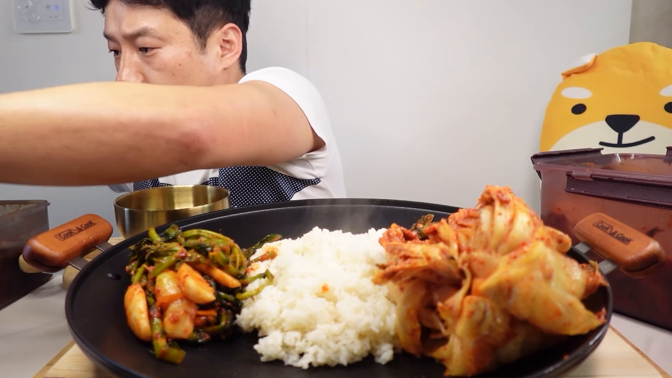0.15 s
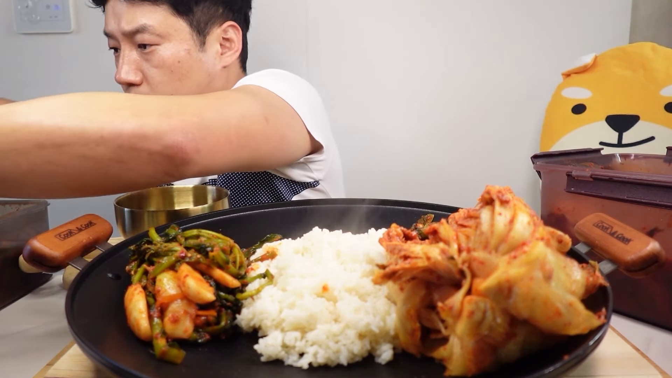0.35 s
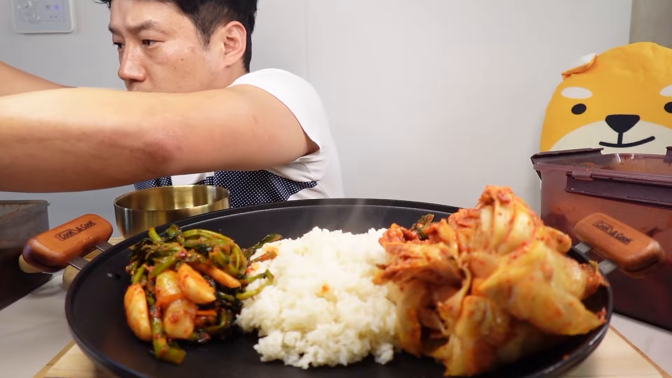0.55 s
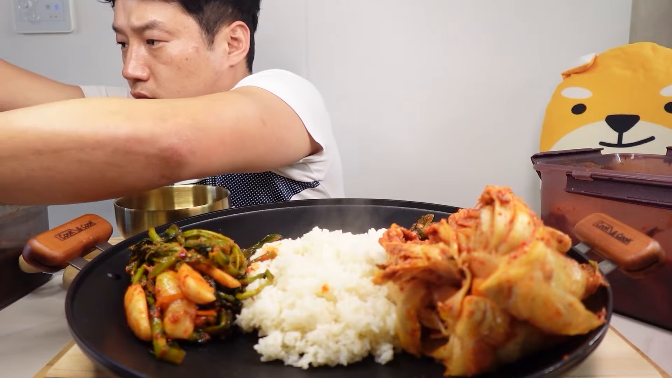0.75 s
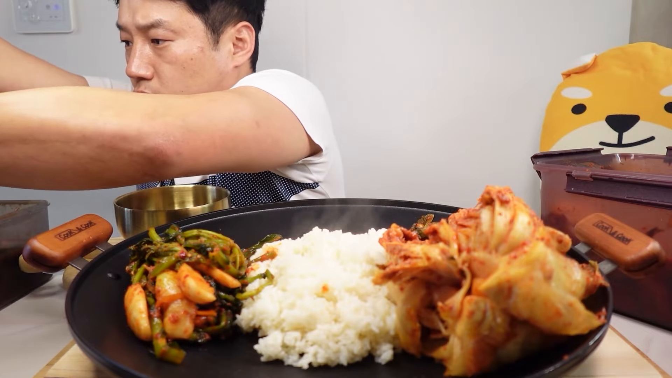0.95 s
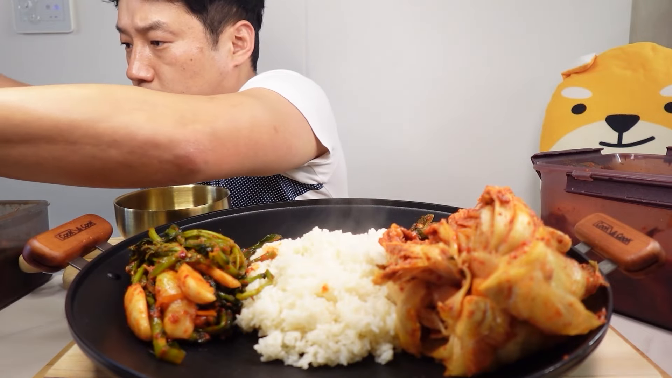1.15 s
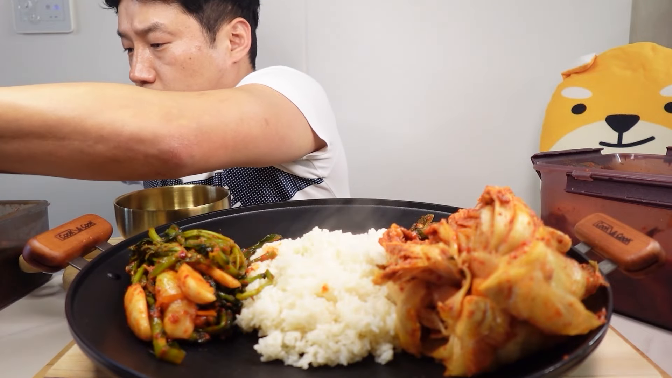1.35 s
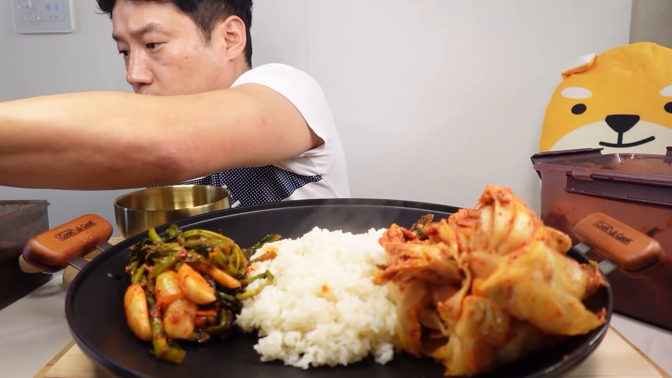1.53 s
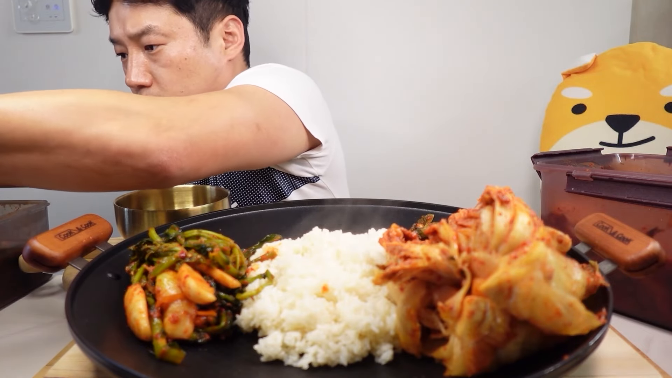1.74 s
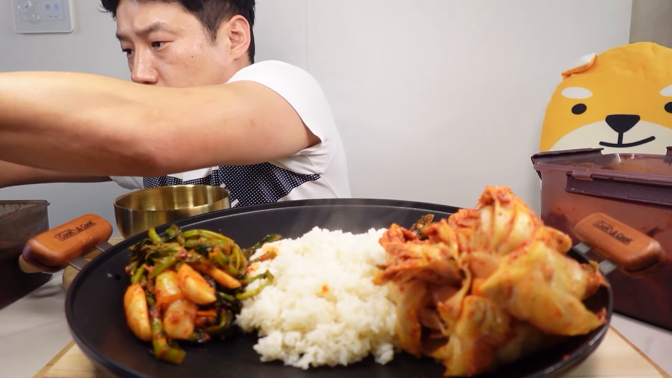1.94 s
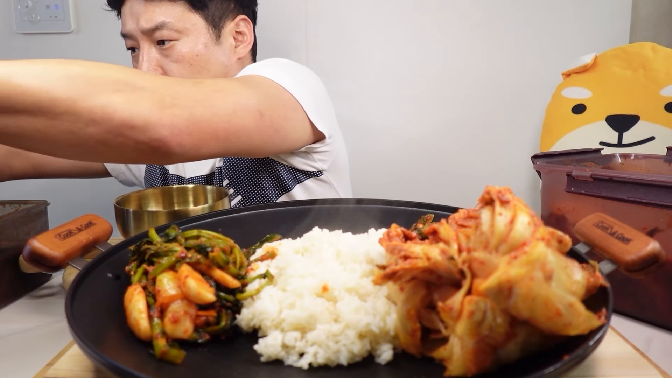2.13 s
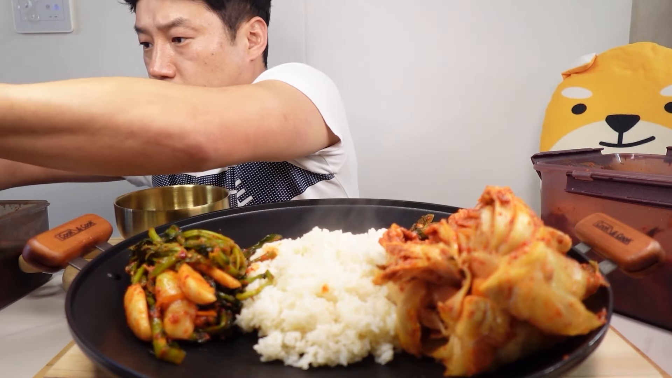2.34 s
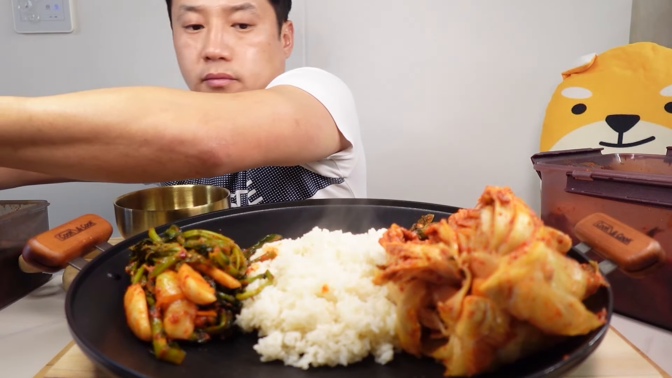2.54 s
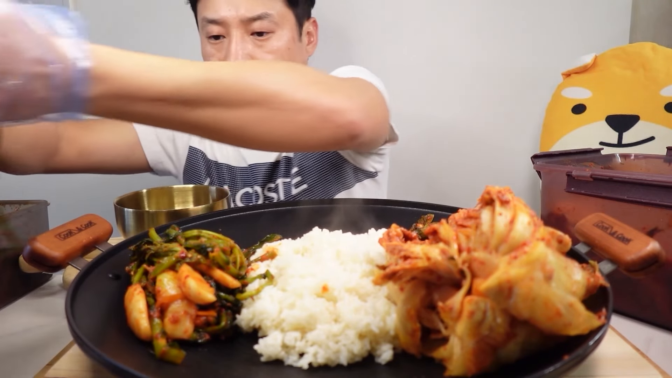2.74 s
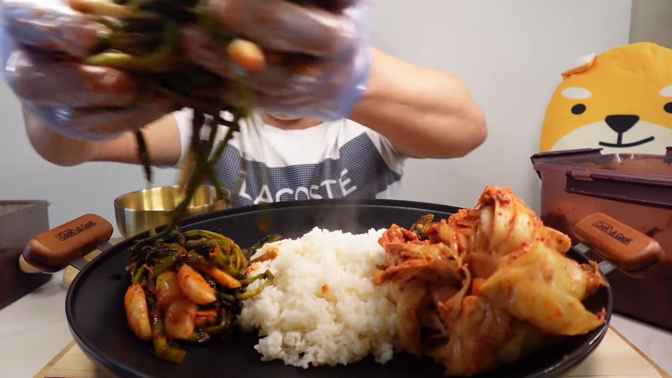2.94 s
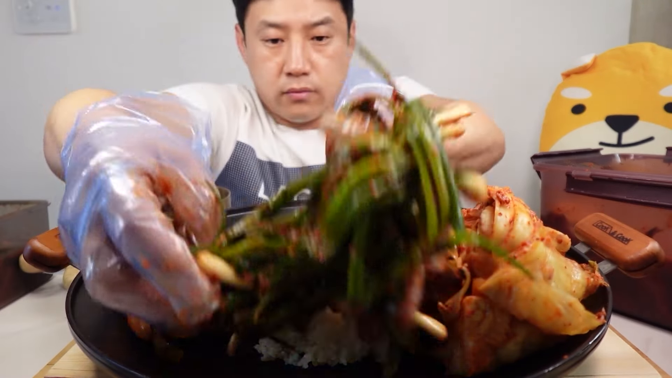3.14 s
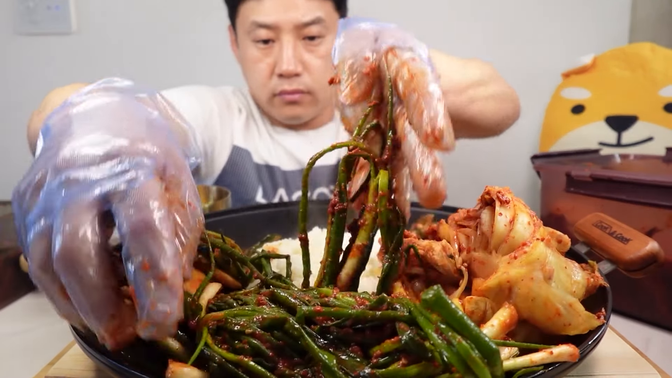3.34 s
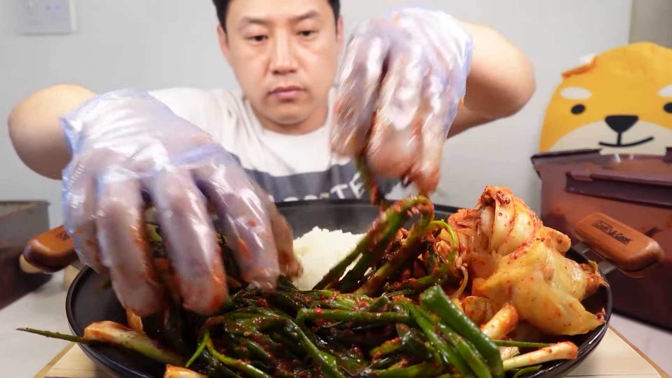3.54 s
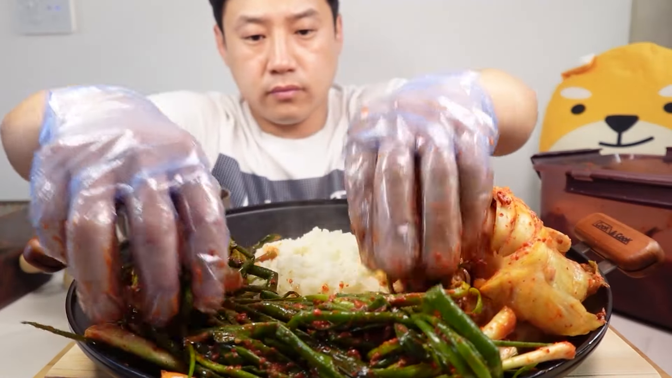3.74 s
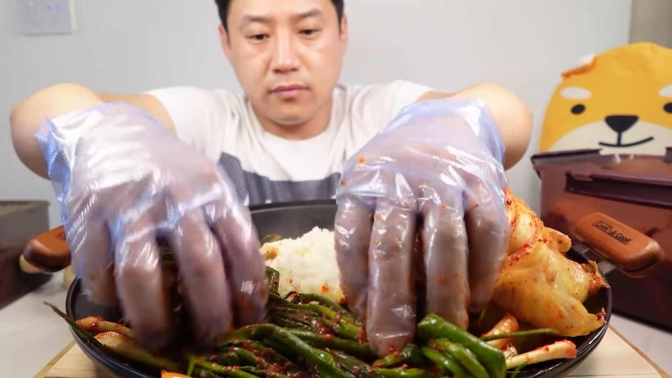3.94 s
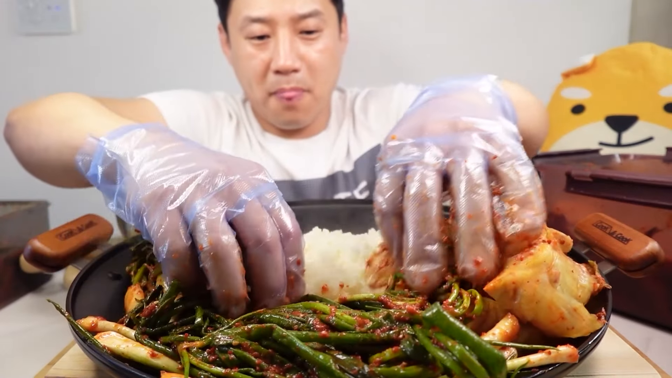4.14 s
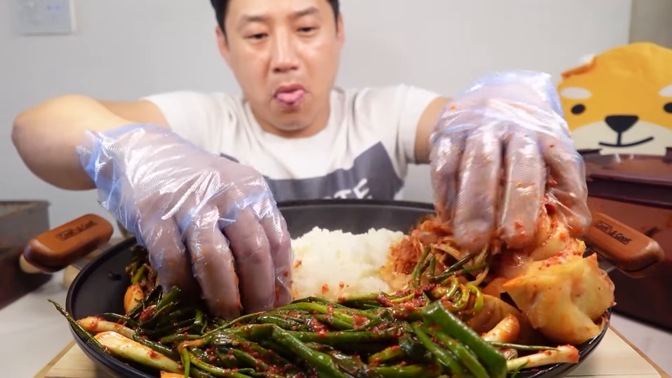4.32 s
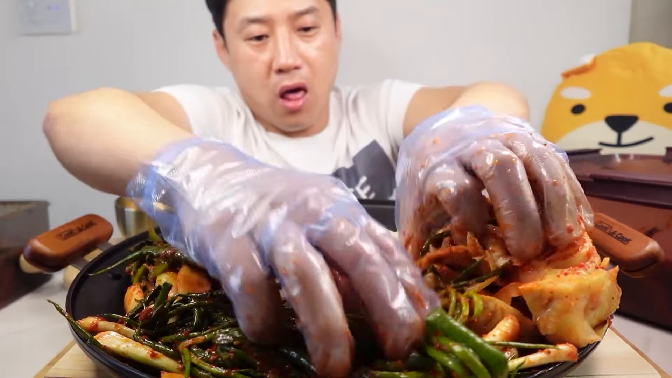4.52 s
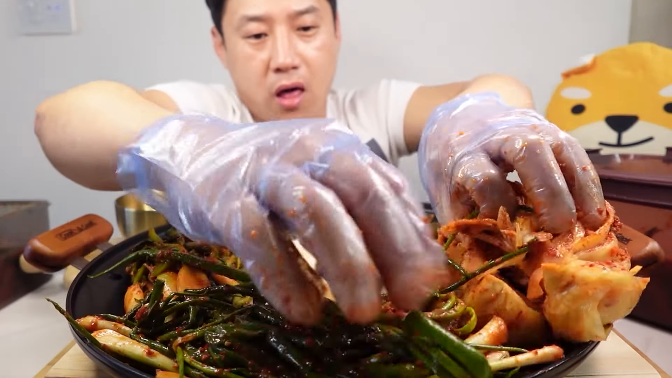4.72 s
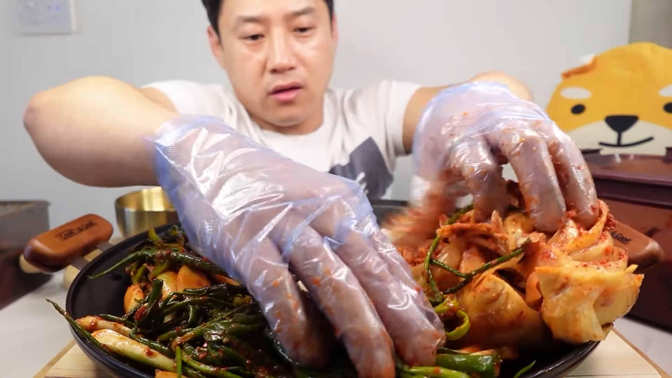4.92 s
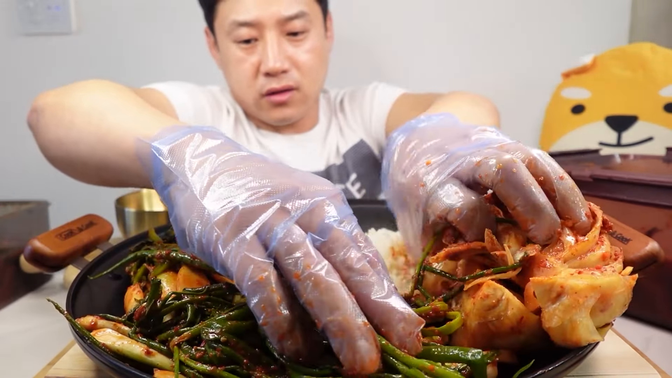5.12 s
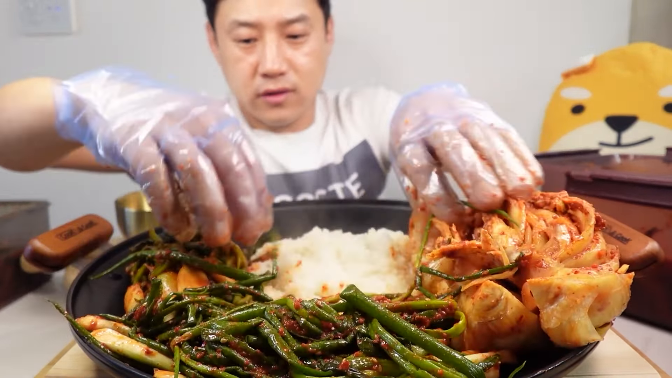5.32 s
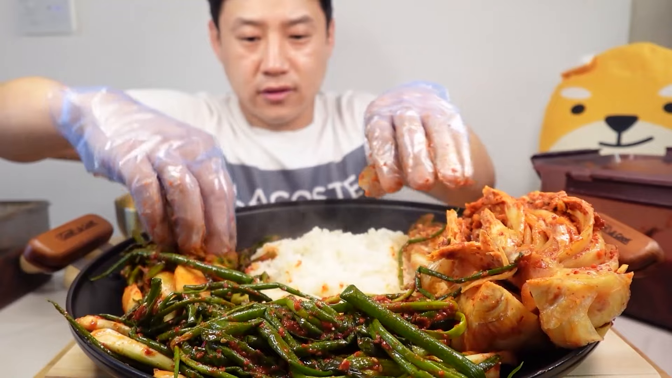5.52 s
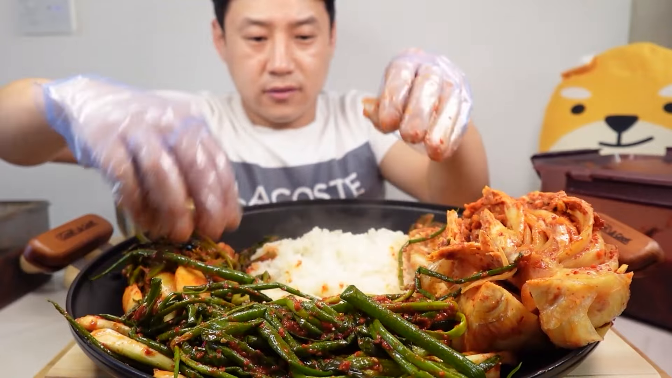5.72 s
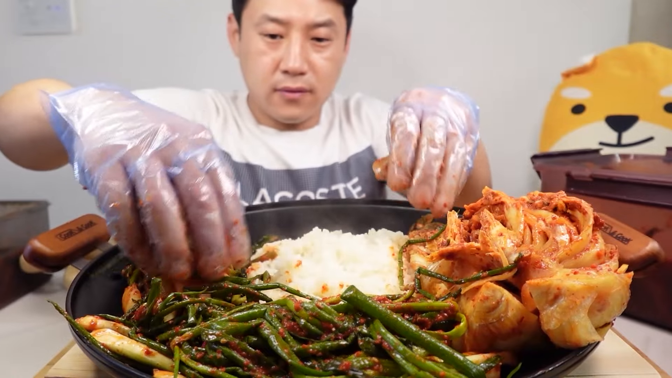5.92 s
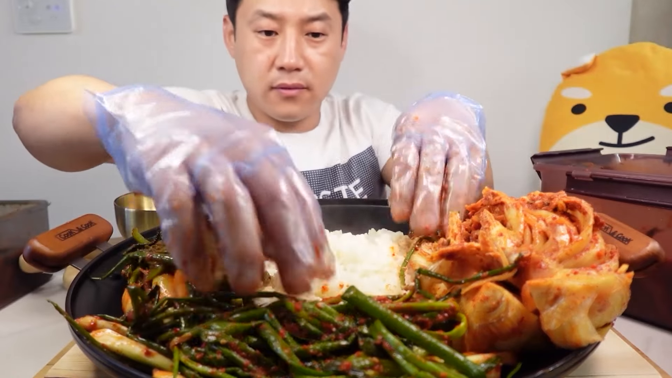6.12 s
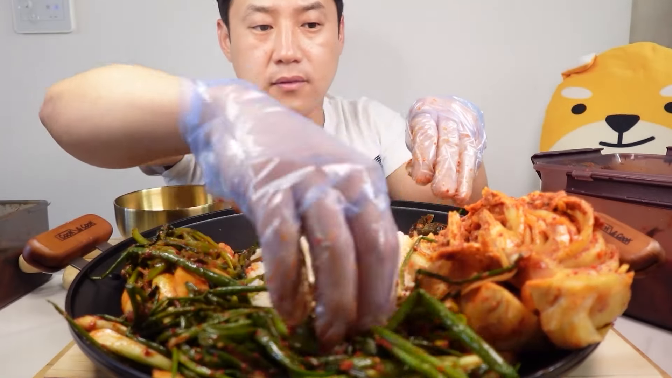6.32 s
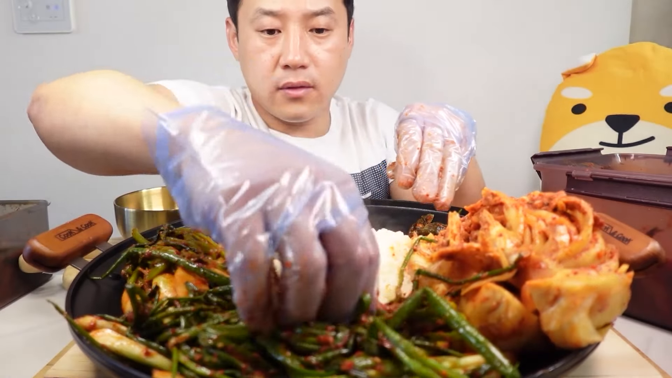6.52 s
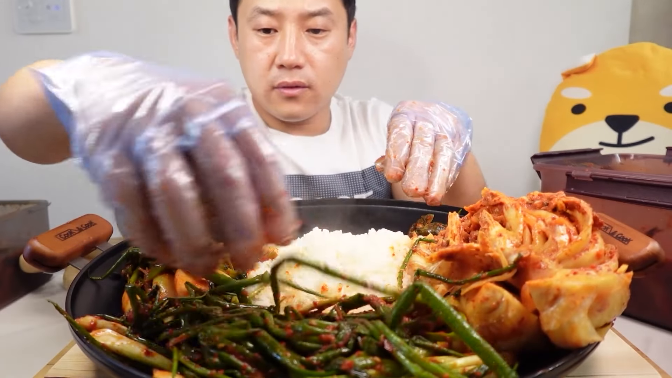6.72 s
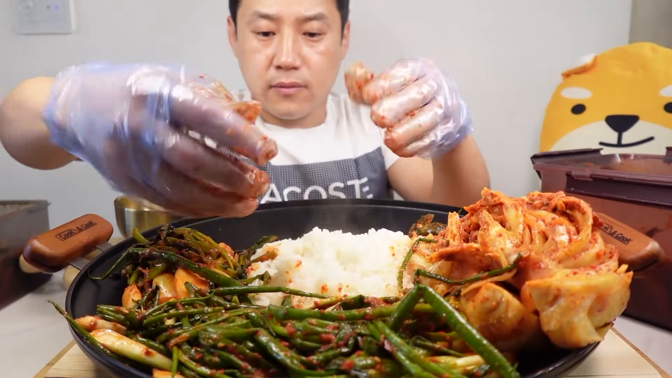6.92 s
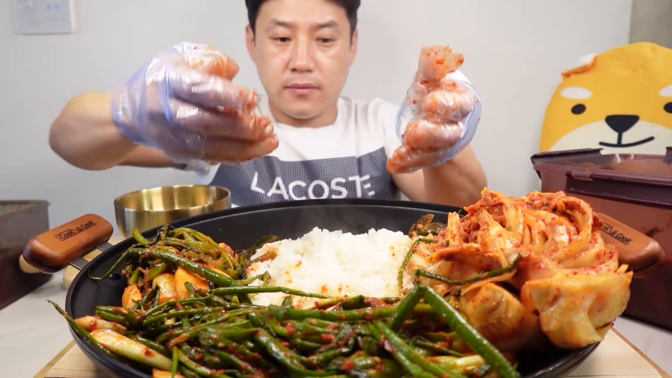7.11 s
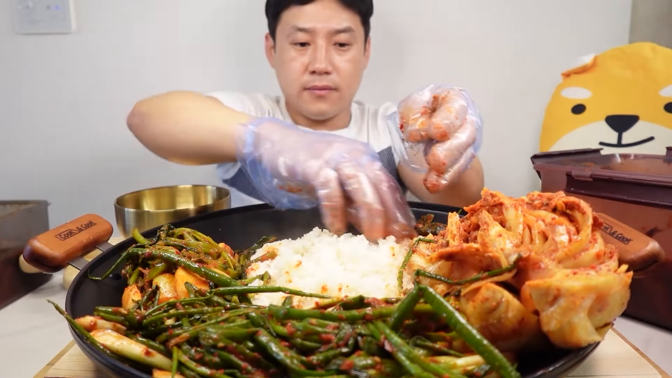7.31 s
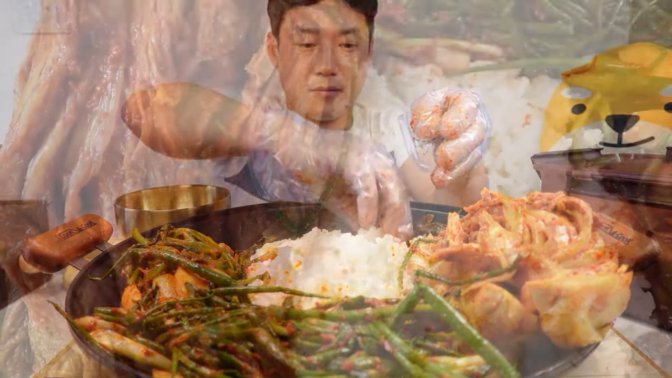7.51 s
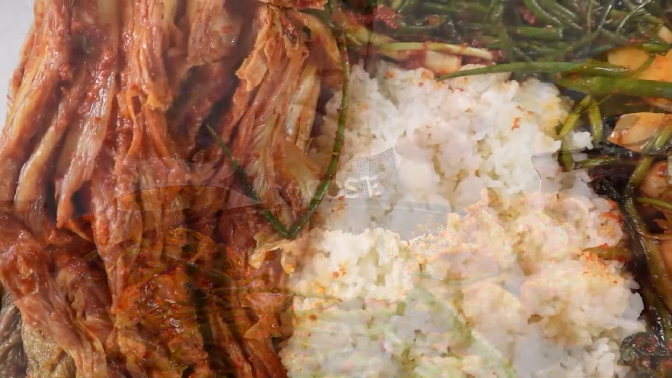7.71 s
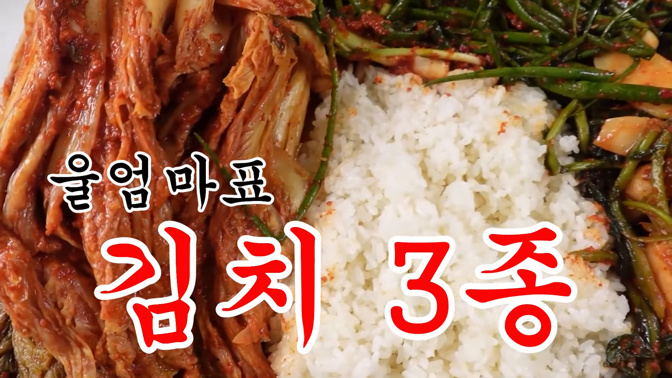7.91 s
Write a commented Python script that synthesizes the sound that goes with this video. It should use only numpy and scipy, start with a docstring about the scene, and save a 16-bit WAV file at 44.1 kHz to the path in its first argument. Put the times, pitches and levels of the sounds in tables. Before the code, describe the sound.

A small room with faint steady hiss. From 0 to about 2.5 s, thin plastic gloves crinkle softly, somewhat to the left and with more room around them: fine dry crackle in short uneven bursts, lower papery folds beneath, only an occasional tiny snap. Around 2.7 s the rustle almost vanishes. From 3 s it returns much closer, centred, drier and louder as the hands lay greens on a near pan. Between 3.2 and 5.2 s the crackle is busiest, packed with bright, sharp crease snaps, strongest about 3.8 to 4.3 s. From 5.3 to 6.7 s it breaks into shorter ticks and brief rustles with small gaps. After 6.8 s the handling grows lighter, with a few weaker snaps. At about 7.6 s everything stops dead, and a quiet, duller, steady room noise remains to the end, around 8 s.

```python
"""A small hissing room: hands in thin plastic gloves gather wet greens at one side, then lay them on a near pan.
Film crackle is random clicks ringing small resonant facets; folds are the same film, coloured lower.
Single creases snap as a resonant crack plus a shiver; dense random echoes scatter everything.
Near the end the rustle stops dead and a duller, steady room noise (coloured noise) takes over."""
import sys
import numpy as np
from scipy import signal
from scipy.fft import rfft, irfft, next_fast_len
from scipy.io import wavfile
from scipy.ndimage import uniform_filter1d

SR = 44100
rng = np.random.default_rng(int(sys.argv[2]) if len(sys.argv) > 2 else 0)


def put_to_file(sound):
    """Save the sound as 16-bit audio at rate SR, in the file named by the first command-line argument."""
    columns = np.atleast_2d(sound).T  # one column per channel
    safe = np.clip(columns, -1, 1)
    whole_steps = np.round(safe * 32767)
    wavfile.write(sys.argv[1], SR, whole_steps.astype(np.int16))


N = 355432
LIFT_S = 2.8  # greens leave the tub
CHANGE_S = 7.628  # rustle stops, room noise changes
CUTOFF_HZ = 16000


def from_db(db):
    """Decibels to gain."""
    return 10 ** (np.asarray(db) / 20)


def rms_one(x):
    """Scale to unit power."""
    return x / np.sqrt(np.mean(x ** 2) + 1e-20)


def in_time(rows):
    """Each column of a curve, interpolated sample by sample."""
    s, *columns = np.transpose(rows)
    return [np.interp(np.arange(N) / SR, s, column) for column in columns]


def coloured(x, spectrum):
    """Filter by a response of (Hz, dB) points, joined on a log frequency axis."""
    size = next_fast_len(N + SR // 10)
    hz, db = np.transpose(spectrum)
    bins_hz = np.maximum(np.fft.rfftfreq(size, 1 / SR), 1)
    gain = from_db(np.interp(np.log(bins_hz), np.log(hz), db))
    return irfft(rfft(x, size) * gain, size)[..., :N]


def drift(rate_hz):
    """Random curve of unit power, joining rate_hz new values a second by straight lines."""
    values = rng.standard_normal(N // 8)
    return rms_one(np.interp(np.arange(N) / SR * rate_hz, np.arange(N // 8), values))


def evened(x, span_s):
    """Hold the short-term power near 1, so that later gains set the level."""
    size = max(int(span_s * SR), 8)
    power = uniform_filter1d(uniform_filter1d(x ** 2, size), size)
    return x / np.sqrt(power + 1e-12)


def facet(clicks, hz, q):
    """A small patch of film rings briefly: two equal resonators in series give steep skirts."""
    r = np.exp(-np.pi * hz / max(q, .5) / SR)
    peak = (1 - r * r) / 2
    resonance = [peak, 0, -peak, 1, -2 * r * np.cos(2 * np.pi * hz / SR), r * r]
    return signal.sosfilt([resonance, resonance], clicks + 1e-18)


# Steady handling between bursts. Each row: time in seconds, relative crackle level in dB,
# relative fold level in dB re crackle.
HANDLING = [(0, -38.5, -14.5), (.4, -54.5, -8), (.65, -44.5, -19), (1.1, -43.5, -13), (1.4, -40.5, -9),
            (1.9, -45, -11), (2.45, -44, -11.5), (2.7, -61, -1), (2.95, -52.5, -9), (3.3, -31.5, -11),
            (3.42, -41, -15), (3.6, -38.5, -11), (5.25, -34, -8), (5.5, -44.5, -9), (6.5, -40, -10),
            (6.9, -50.5, -7.5), (7.15, -43, -15.5), (7.6, -42, -6)]
# Bursts of crackle, from very brief to about 0.2 s. Each row: start in seconds, length in seconds,
# relative crackle level in dB, relative fold level in dB re crackle.
BURSTS = [(0.0, 0.085, -45, -4), (0.148, 0.15, -41.5, -15), (0.52, 0.068, -42, -21),
          (0.718, 0.027, -39, -19), (0.777, 0.075, -39.5, -12.5), (0.946, 0.12, -46.5, -9),
          (1.244, 0.119, -37.0, -25), (1.551, 0.13, -37.5, -7.5), (2.07, 0.081, -36.5, -19),
          (2.245, 0.091, -44.5, -23), (2.578, 0.07, -46.5, -10), (3.003, 0.141, -40, -13),
          (3.186, 0.13, -30.5, -12.5), (3.324, 0.052, -38, -6.5), (3.499, 0.2, -34.0, -16.5),
          (3.671, 0.038, -30, -9), (3.736, 0.066, -30, -11.5), (3.946, 0.051, -28, -17),
          (4.019, 0.031, -32.5, -10), (4.123, 0.12, -30, -14.5), (4.359, 0.062, -33.5, -12),
          (4.478, 0.19, -30.0, -12), (4.769, 0.1, -35.5, -16), (4.941, 0.14, -31.5, -11.5),
          (5.073, 0.094, -34, -8), (5.293, 0.0069, -29.0, -10), (5.397, 0.042, -37.5, -10),
          (5.519, 0.022, -33, -17), (5.572, 0.026, -42.0, -14), (5.631, 0.019, -36, -23),
          (5.674, 0.031, -39, -21), (5.776, 0.061, -34, -14.5), (5.87, 0.01, -33.0, -14),
          (6.046, 0.051, -32.5, -10.5), (6.15, 0.075, -35, -9), (6.239, 0.029, -29, -13.5),
          (6.348, 0.016, -33, -9.5), (6.5, 0.094, -33.5, -9.5), (6.662, 0.063, -37.0, -10),
          (6.79, 0.066, -38.5, -10.5), (6.93, 0.17, -39.5, -20), (7.179, 0.18, -41.5, -16.5),
          (7.336, 0.064, -40, -8), (7.472, 0.025, -36.5, -6.5)]
ATTACK_S, EASE_DB, RELEASE_S = 0.016, 1.06, 0.029
LULL_DB, LULL_S = 11.5, 0.017  # dip of the handling after a burst: depth, time of its deepest point


def effort():
    """Crackle and fold gains: bursts build, ease and die, adding power to handling that dips after each."""
    t = np.arange(N) / SR
    steady_db, steady_folds_db = in_time(HANDLING)
    crackle_power, fold_power = np.zeros((2, N))
    for start_s, length_s, db, folds_db in BURSTS:
        near = (t > start_s) & (t < start_s + length_s + 10 * RELEASE_S)
        age_s = t[near] - start_s
        idle_s = np.maximum(age_s - length_s, 0)
        attack = np.minimum(age_s / ATTACK_S, 1)
        eased_db = db - EASE_DB * np.minimum(age_s / length_s, 1)
        gain = attack * from_db(eased_db) * np.exp(-idle_s / RELEASE_S)
        crackle_power[near] += gain ** 2
        fold_power[near] += (gain * from_db(folds_db)) ** 2
        lull = (idle_s / LULL_S) ** 2
        steady_db[near] -= LULL_DB * lull * np.exp(1 - lull)
    crackle_power += from_db(steady_db) ** 2
    fold_power += from_db(steady_db + steady_folds_db) ** 2
    return np.sqrt(crackle_power), np.sqrt(fold_power)


def buckles(per_s, spread_db, flurry_db, flurry_hz, patchy_db, q, rub_db, stiffness, count=14):
    """Film buckles in flurries; each click rings one facet, over the soft hiss of film sliding on film."""
    flurry = from_db(flurry_db * (drift(flurry_hz) + 0.75 * drift(450)))
    sizes_db = spread_db * np.minimum(rng.exponential(1, N), 4.5)
    clicks = rng.choice([-1, 1], N) * (rng.random(N) < per_s / SR)
    facet_of_click = rng.integers(0, count, N)
    rings = 0
    for k, hz in enumerate(np.linspace(1650, 16500, count)):
        # high-pitched, stiff facets vary most in size; each has busy and quiet moments
        blow_db = sizes_db * (hz / 10000) ** stiffness + patchy_db * drift(45)
        blows = clicks * (facet_of_click == k) * from_db(blow_db)
        rings = rings + rms_one(facet(blows, hz, q))
    rub = from_db(rub_db) * rng.standard_normal(N)
    return flurry * (evened(rings, 0.28) + rub)


# Colour of the fine crackle. Each row: frequency in Hz, relative density in dB per Hz.
CRACKLE = [(1500, -53), (3000, -17.5), (4200, -7), (5300, -3), (6600, 1.2), (7500, 0.5), (8500, 2.5),
           (9800, 0.5), (12500, 2.1), (16000, 0.5)]


def fine_crackle(film, gain):
    """Small facets: the film's bright part, following the crackle gain."""
    return from_db(-0.63) * gain * evened(coloured(film, CRACKLE), 0.028)


# Colour of the folds in the tub. Each row: frequency in Hz, relative density in dB per Hz.
TUB = [(200, -37), (640, -7.5), (1150, -9.5), (1900, -14), (2700, -1), (3200, 2.5), (3900, -5),
       (4500, -2.5), (8000, -30)]
# Colour of the folds after the lift. Each row: frequency in Hz, relative density in dB per Hz.
FOLDS = [(60, -62), (150, -50), (300, -22.5), (450, -15), (620, -5.5), (800, -9.5), (1100, -6), (1550, -9),
         (2200, 0), (2600, -0.5), (3100, 2), (3800, -2), (5000, -6), (9000, -16.5)]


def larger_folds(film, gain):
    """Larger folds: the same film coloured lower, by the tub until the greens are lifted."""
    in_tub = np.arange(N) / SR < LIFT_S
    rustle = np.where(in_tub, coloured(film, TUB), coloured(film, FOLDS))
    return from_db(-1.5) * gain * evened(rustle, 0.014)


# Lesser creases, levels relative
CREASES_PER_S, CREASE_ABOVE_CRACKLE_DB, CREASE_SPREAD_DB = 26, 16.5, 2
CREASE_HZ, CREASE_SPREAD_OCTAVES, CREASE_SHIVER_DB = 9500, 0.39, -9.5


def lesser_creases(crackle_gain):
    """Chance snaps in runs, louder where the crackle is; rows as in SNAPS."""
    gaps = rng.standard_normal(SR) ** 2  # mean 1, mostly short
    size, pitch = rng.standard_normal((2, SR)).clip(-2, 2)
    s = np.cumsum(gaps) / CREASES_PER_S
    crackle_db = 20 * np.log10(np.interp(s * SR, np.arange(N), crackle_gain))
    db = crackle_db + CREASE_ABOVE_CRACKLE_DB + CREASE_SPREAD_DB * size
    hz = CREASE_HZ * 2 ** (CREASE_SPREAD_OCTAVES * pitch)
    return np.transpose([s, db, hz, np.full(len(s), CREASE_SHIVER_DB)])[s < CHANGE_S]


# Loudest creases. Each row: time in seconds, relative level in dB, pitch in Hz,
# shiver in dB re the crack before softening.
SNAPS = [(0.4233, -23.5, 10800, -4), (0.5247, -18, 14100, -3), (0.87, -13.5, 14500, -5),
         (2.0916, -21, 13300, -2), (2.2645, -17, 11400, -1), (2.905, -28, 12900, -2),
         (3.037, -15, 14300, -3), (3.0861, -11.5, 8350, -3), (3.137, -17, 6420, -1),
         (3.2124, -12, 6640, -2), (3.2864, -10, 6720, -2), (3.3802, -11, 8140, -2), (3.529, -9, 8500, -5),
         (3.6145, -16, 12600, -4), (3.695, -12, 7420, -2), (3.8048, -6, 12300, -2.5),
         (3.8577, -6, 12400, -0.5), (3.9668, -10, 8260, -2), (3.9816, -9, 12200, -2),
         (4.2078, -4, 12500, -3), (4.241, -7.5, 11200, -3), (4.345, -9, 10200, -2), (4.363, -9.5, 8700, -3),
         (4.4024, -15, 9300, 0), (4.5296, -9.5, 8110, -3), (4.5925, -10, 8980, 0), (4.803, -10, 9630, -1),
         (4.8399, -11, 6980, -3), (5.037, -10, 8880, -2), (5.1417, -14, 8910, -2), (5.4788, -19.5, 9600, 1),
         (5.7478, -17, 12400, -2), (5.7963, -8, 8200, -3), (5.876, -16, 13400, -1),
         (5.9384, -13, 11900, -2), (6.0716, -9, 13800, -3), (6.1634, -10.5, 12700, -4),
         (6.2123, -10.5, 8970, 0), (6.2537, -10.5, 13400, 0), (6.3609, -14.5, 6500, -3),
         (6.549, -10, 8450, -3), (6.6333, -18.5, 11900, -4), (6.6946, -10, 14700, -4),
         (6.9336, -21, 11800, -2), (6.983, -13, 12300, -1), (7.189, -20.5, 11400, -3),
         (7.2665, -14.5, 11600, -2), (7.2993, -16, 7600, 0)]


def snaps(crackle_gain, level_db, q, crack_s, slowness, softening_db, shiver_s, broad):
    """A crease gives way in one crack; the film round it settles in a shiver of smaller clicks."""
    out, t = np.zeros(N), np.arange(SR // 25) / SR
    for s, db, hz, shiver_db in [*SNAPS, *lesser_creases(crackle_gain)]:
        # long, low-pitched creases give way more slowly and softly
        length = 12500 / hz
        ring_hz = min(hz, CUTOFF_HZ)
        crack = rng.choice([-1, 1], len(t)) * np.exp(-t / (crack_s * length ** slowness))
        crack = facet(crack, ring_hz, q)
        sparse = rng.standard_normal(len(t)) * (rng.random(len(t)) < .25)
        shiver = sparse * np.exp(-t / (shiver_s * length))
        # a broad resonance spreads the shiver over more pitches
        shiver = facet(shiver, ring_hz, q) + broad * facet(shiver, 7500, 0.46)
        crack, shiver = [r / np.sqrt(np.sum(r ** 2)) for r in (crack, shiver)]
        snap = from_db(-softening_db * np.log2(length)) * crack + from_db(shiver_db) * shiver
        at = int((s + .001) * SR)
        out[at:at + len(t)] += from_db(db + level_db) * snap
    return out


def echoes(x, t60_s, delay_s, channels, size=1024):
    """Dense dying reflections whose random paths change block by block."""
    t = np.arange(int(np.clip(t60_s, .01, .5) * SR * 2 / 3)) / SR
    shape = from_db(-60 * t / t60_s) * np.clip(t / delay_s - 1, 0, 1)
    shape /= np.sqrt(np.sum(shape ** 2)) + 1e-12
    paths = rng.standard_normal((channels, SR))
    out = np.zeros((channels, N + size + len(t)))
    picks = rng.integers(0, SR // 2, N // size + 1)
    for at, pick in zip(range(0, N, size), picks):
        response = shape * paths[:, pick:pick + len(t)]
        tail = signal.fftconvolve(x[None, at:at + size], response, axes=1)
        out[:, at:at + tail.shape[1]] += tail
    return out[:, :N]


def scattered(source, wet_db, pan_db):
    """Pan and hands scatter first, then the room; the direct sound is placed left to right."""
    direct = source + from_db(-10.0) * echoes(source, t60_s=0.025, delay_s=0.00039, channels=1)[0]
    # small random wavering between left and right
    near = direct * from_db((pan_db + .8 * drift(69)) / 2 * np.array([[1], [-1]]))
    wet = from_db(wet_db)
    room = wet * echoes(direct, t60_s=0.088, delay_s=0.0022, channels=2)
    return (near + room) / np.sqrt(1 + wet ** 2 / 2)


# Where the hands work. Each row: time in seconds, room share in dB re direct, left minus right in dB,
# buckles per second, spread of their sizes in dB at 10 kHz.
REACH = [(0, -5, 4, 8500, 4), (1.7, -4.5, 4.5, 9500, 3), (2.5, -6, 4.4, 7200, 2), (3.1, -13, 0.5, 4400, 2),
         (4.3, -14.5, -0.5, 3700, 3.5), (5.2, -13.5, -0.5, 5400, 3), (5.6, -11, 1, 3300, 4.5),
         (6.7, -13, 0, 3000, 2.5), (7.6, -11.5, 0, 4100, 4)]


def gloves():
    """Crackle, folds and snaps of one film, with the bass gently rolled off below about 260 Hz."""
    crackle_gain, fold_gain = effort()
    wet_db, pan_db, per_s, spread_db = in_time(REACH)
    film = buckles(per_s, spread_db, flurry_db=2.0, flurry_hz=110, patchy_db=3.0, q=1.54,
                   rub_db=-5.5, stiffness=1.05)
    creases = snaps(crackle_gain, level_db=5.0, q=1.95, crack_s=0.00022, slowness=2.1,
                    softening_db=2.0, shiver_s=0.0029, broad=1.1)
    source = fine_crackle(film, crackle_gain) + larger_folds(film, fold_gain) + creases
    heard = scattered(source, wet_db, pan_db)
    return signal.sosfilt(signal.butter(1, 260, "high", fs=SR, output="sos"), heard)


def room_noise(spectrum, side_db):
    """Steady diffuse noise of unit mid power, partly alike at both ears."""
    mid, side = rms_one(coloured(rng.standard_normal((2, N)), spectrum))
    return mid + from_db(side_db) * side * [[1], [-1]]


# Colour of the hiss. Each row: frequency in Hz, relative density in dB per Hz.
HISS = [(30, -54), (60, -40), (120, -26), (200, -21.5), (350, -9.5), (600, -2), (1000, 2), (1700, 5),
        (2800, 3.5), (4000, 3.5), (9000, -3), (16000, -8.5)]


def hiss():
    """Steady room hiss behind the hands."""
    return from_db(-53.5) * room_noise(HISS, side_db=-5)


# Colour of the duller noise. Each row: frequency in Hz, relative density in dB per Hz.
DULL_ROOM = [(30, -31), (100, -29), (170, -16), (300, -10.5), (600, -4), (850, -0.5), (1300, -4.5),
             (2100, -5), (3000, -8.5), (6000, -12), (13000, -16), (16000, -19)]


def dull_room():
    """Duller steady room noise after the rustle stops."""
    return from_db(-53) * room_noise(DULL_ROOM, side_db=-6)


def scene():
    """Gloves over hiss, crossfaded in 3.5 ms to the duller room noise."""
    after = np.clip((np.arange(N) / SR - CHANGE_S) / 0.0035 + .5, 0, 1)
    handling = gloves() + hiss()
    return (1 - after) * handling + after * dull_room()


def record(dry):
    """Cut the top steeply with an elliptic low-pass."""
    return signal.sosfilt(signal.ellip(12, .1, 80, CUTOFF_HZ, fs=SR, output="sos"), dry)


dry = scene()
out = record(dry)
put_to_file(out)
```